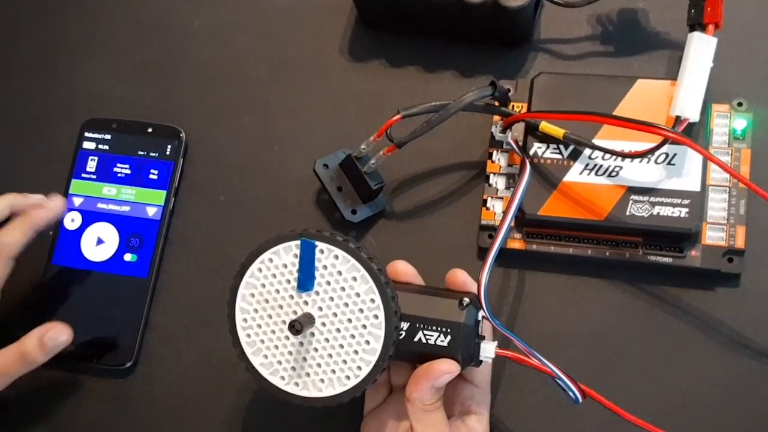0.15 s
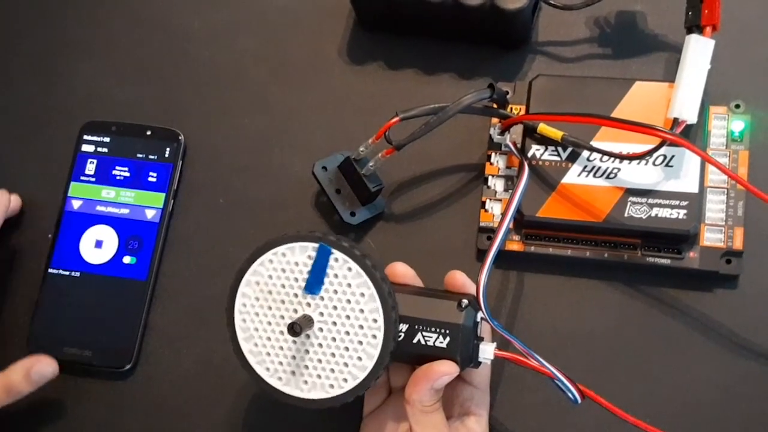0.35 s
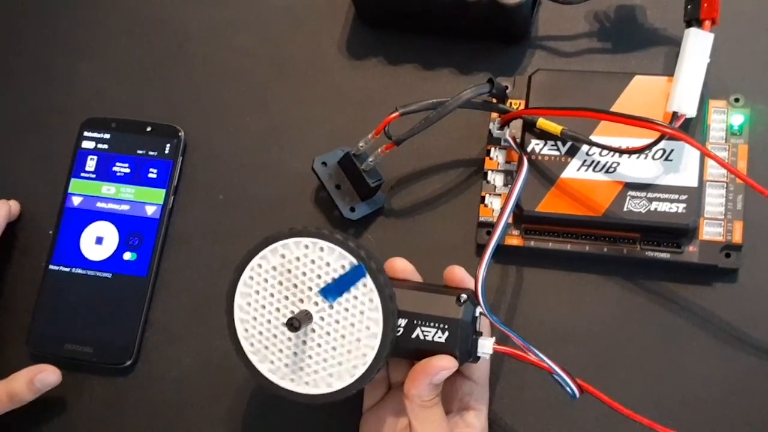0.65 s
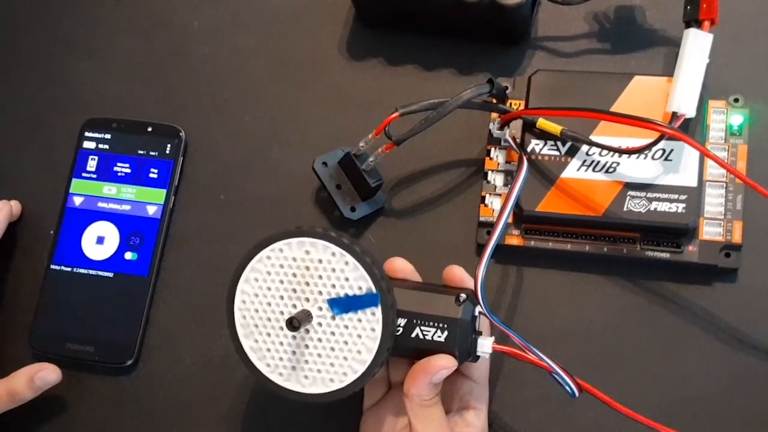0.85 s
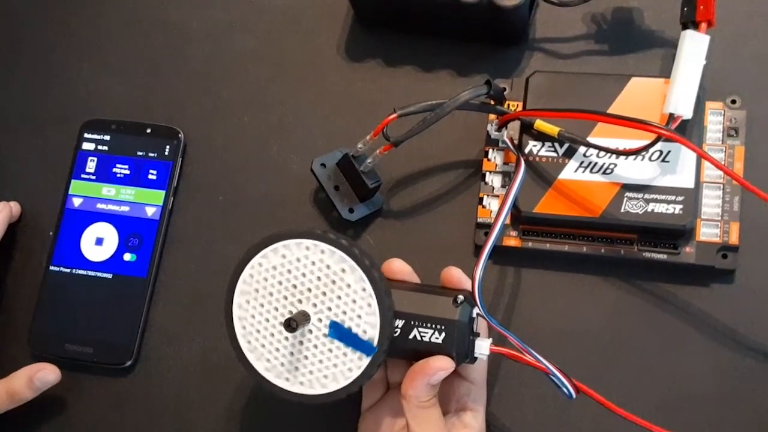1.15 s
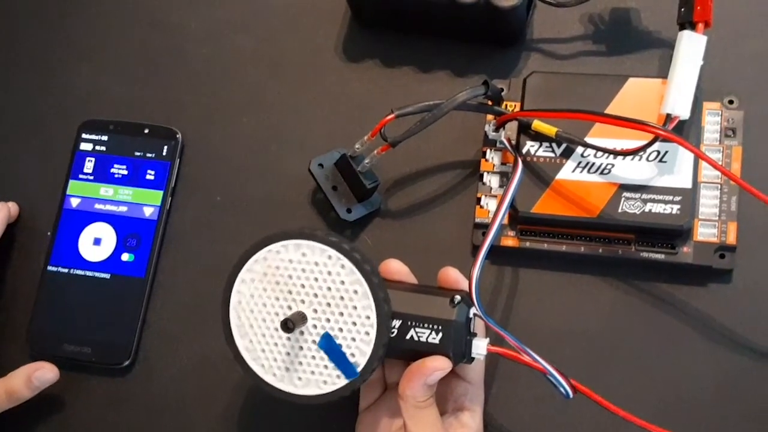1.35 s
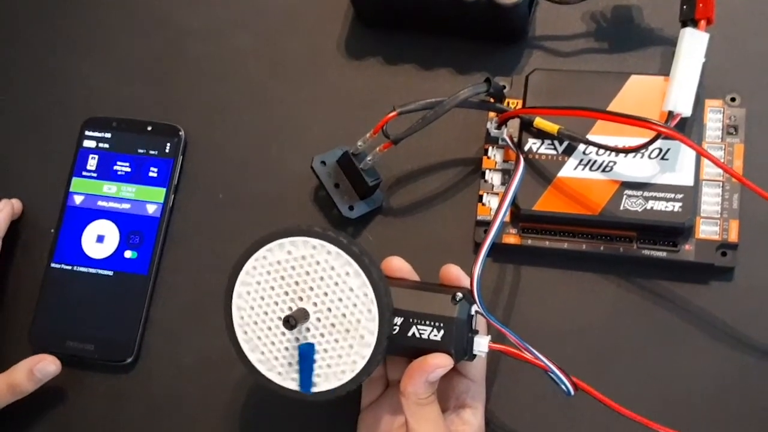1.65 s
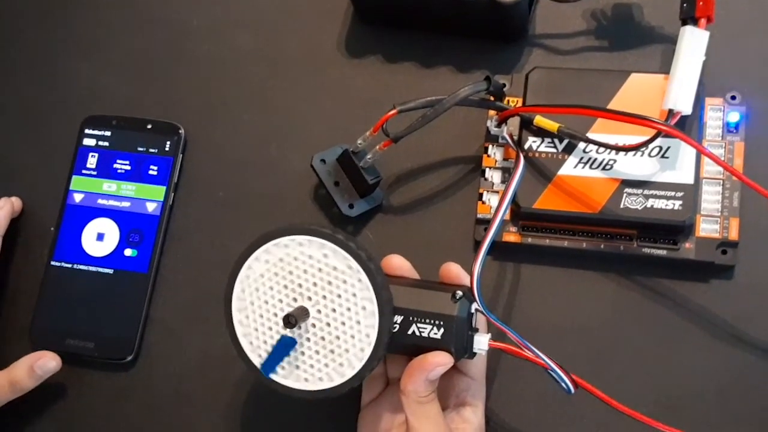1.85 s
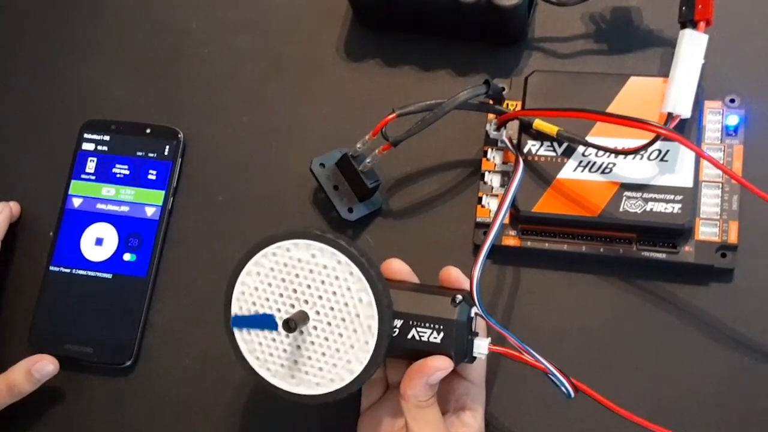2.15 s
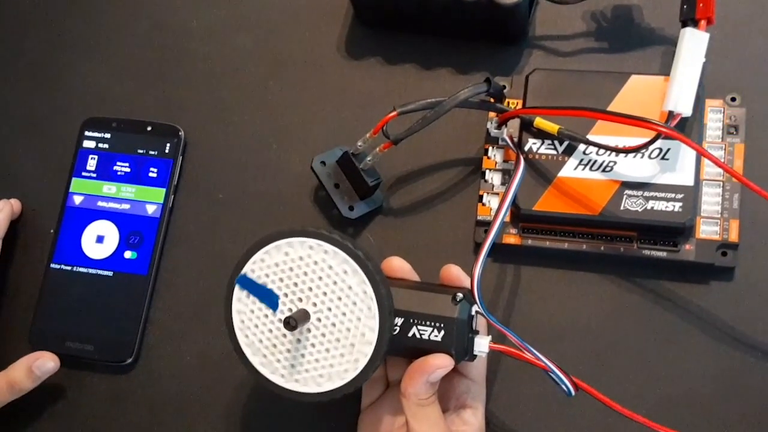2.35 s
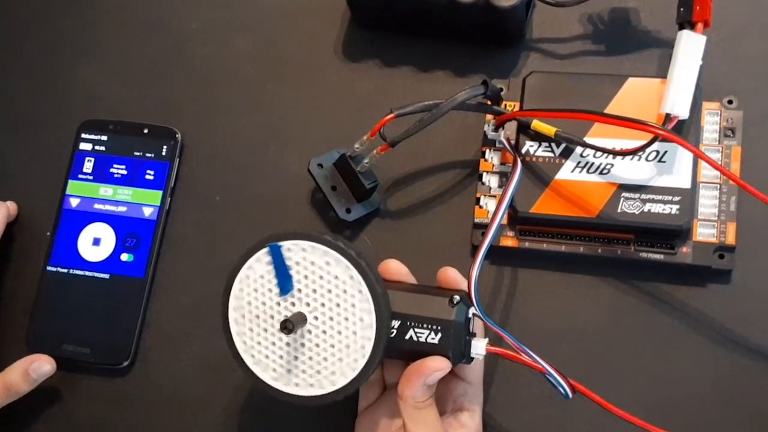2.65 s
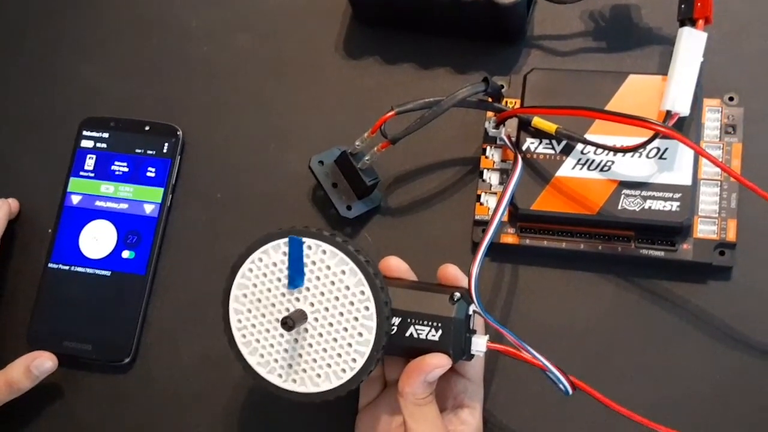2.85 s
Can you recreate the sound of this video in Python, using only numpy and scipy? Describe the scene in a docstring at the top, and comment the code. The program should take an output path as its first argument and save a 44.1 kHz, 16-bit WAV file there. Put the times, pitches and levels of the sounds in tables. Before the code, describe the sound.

Close up indoors, a hand-held gear motor buzzes into life, its rapid plastic gear chatter climbing in pitch over a faint thin electronic tone, holds steady, then halts abruptly, leaving soft room hum.

```python
"""In a quiet room with a low hum, a small geared electric motor is held in a hand over a table.
It starts, climbs to speed in steps and stops. Each gear tooth ticks into the plastic housing: it taps,
scratches and taps again, over steady rubbing. A 10-tooth pinion and a 30-tooth gear pattern the ticks.
Bright clicks mark the play in the gears being taken up, and the hand and table carry a low rumble.
The drive electronics sing one thin high tone, and the walls answer the motor."""
import sys
import numpy as np
from scipy import signal
from scipy.fft import rfft, irfft, next_fast_len
from scipy.io import wavfile

SR = 44100
rng = np.random.default_rng(int(sys.argv[2]) if len(sys.argv) > 2 else 0)


def to_wav(s):
    """Save 16-bit WAV."""
    ch = np.atleast_2d(s).T  # columns
    pcm = np.round(np.clip(ch, -1, 1) * 32767)  # PCM
    wavfile.write(sys.argv[1], SR, pcm.astype(np.int16))


N = 132300

# Colour of the room noise. Each row: frequency in Hz, relative strength in dB per Hz.
AIR_COLOUR = [(18, -7), (30, -43), (98, -18.5), (232, -4.5), (434, -7), (470, -14.5), (678, -7), (733, -18),
              (881, -21), (2200, -18), (2450, -19.5), (9560, -36), (15700, -20)]
# How alike the room noise is on left and right. Each row: frequency in Hz, likeness (1 = the same).
AIR_LIKENESS = [(60, .55), (300, 0.8), (640, 0.43), (3000, 0.34), (12000, .1)]
# Parts of the low hum. Each row: frequency in Hz, level in dB.
HUM_PARTS = [(59.2, -83), (150.7, -77.5), (247.6, -77), (360.7, -75)]
# The tone of the drive electronics. Each row: time in seconds, level in dB.
WHINE_LEVEL = [(.125, -110), (.13, -72), (.31, -70), (1.17, -62.5), (1.92, -60.5), (2.655, -60.5),
               (2.665, -110)]
# How fast the room's answer dies. Each row: frequency in Hz, seconds to fall by 60 dB.
WALL_DECAY = [(1000, .22), (2500, 0.5), (4000, 0.28), (7000, 0.38), (12000, 0.34)]
# Colour of the shaking through hand and table. Each row: frequency in Hz, relative strength in dB per Hz.
RUMBLE_COLOUR = [(40, -13), (100, -8), (200, -1.5), (400, -2.5), (700, -12), (1100, -11), (1500, -64)]
# Gear play being taken up. Each row: time in seconds, starting level in dB before colouring.
SLACK_CLICKS = [(0.1386, -42.5), (2.6467, -33), (2.6529, -23)]
# Colour of those clicks. Each row: frequency in Hz, gain in dB.
SLACK_TONE = [(700, -45), (1400, -14), (3000, -3), (5000, 2), (13000, 2), (16000, -8)]
# How fast the gears run. Each row: time in seconds, teeth meshing per second.
TOOTH_RATE = [(.131, 10), (.15, 85.7), (.19, 134.2), (.23, 156.9), (.3, 163.2), (.38, 188.7), (.46, 194.2),
              (.57, 196.4), (.61, 224.3), (.68, 230.5), (.78, 245.7), (1.03, 247.2), (1.08, 269),
              (1.16, 273.3), (1.35, 272.8), (1.41, 288.2), (1.48, 283.8), (1.56, 300.1), (1.76, 301.3),
              (1.82, 320), (1.91, 329.8), (1.97, 309.3), (2.06, 329.1), (2.64, 330.2), (2.68, 261),
              (2.72, 202.2), (2.749, 84.5), (2.765, 65), (2.77, 0)]
# How hard the gears work. Each row: time in seconds, level in dB, treble over it in dB before the lift.
GEAR_LOAD = [(.13, -52.5, -17), (.19, -42.5, -14.5), (.3, -37.5, -14), (.36, -34.5, -10),
             (.39, -36.5, -14.5), (.44, -34.5, -13.5), (.51, -35, -9.5), (.55, -36, -11), (.62, -34.5, -13),
             (.9, -34, -12.5), (.93, -34.5, -15.5), (.97, -34.5, -12.5), (1.82, -35, -12),
             (1.865, -35, -10), (1.91, -34.5, -16.5), (1.955, -34.5, -10), (2.0, -35, -11.5),
             (2.46, -35, -12.5), (2.5, -33.5, -11.5), (2.55, -35, -14), (2.64, -35.5, -11),
             (2.68, -34.5, -10), (2.75, -37.5, -14.5), (2.77, -58, -12)]
# Strength of each tooth of the gear, in dB.
TOOTH_STRENGTH_DB = [2, 2, 1, 1, -2, 1, -3, 0, -8, 0, -3, 1, 1, 1, 0, -5, 0, -2, 1, 0, 0, 1, 1, 2, 0, 1, -2,
                     1, 2, -5]
# Low, middle and high layer of a tick. Each row: scratch time in seconds, random scatter in dB,
# swing with the pinion in dB, swing with the gear in dB, scratch over the tap in dB,
# rubbing at full speed in dB, left-right likeness of the grit from 0 to 1.
TICK_LAYERS = [(.0006, 1.1, 1, 0.091, -3.5, 1, 0.5), (.0007, 0.7, -0.7, 0.033, -8, -9, 0.76),
               (.0009, 1.1, 1.06, 0.51, 8.5, 8.5, .45)]
# Where the three layers begin and end, in Hz.
LAYER_EDGES_HZ = [200, 2150, 6300, 17000]
# Resonances of the plastic housing. Each row: frequency in Hz, relative gain in dB.
HOUSING_GAIN = [(410, -56.5), (700, -35), (1160, -29), (1360, -15.5), (1510, -7.5), (1660, -12.5),
                (1980, -20.5), (2250, -21.5), (2520, -12.5), (2750, -16), (2970, -13.5), (3300, -14.5),
                (3650, -14.5), (3850, -6.5), (3980, -0.6), (4320, 0.1), (4580, -3), (4820, -10),
                (5100, -7.5), (5450, -10), (6160, -12.5), (6700, -10), (7390, -19.5), (7990, -18.5),
                (8660, -13), (9100, -24.5), (9450, -16.5), (10300, -21.5), (11000, -16.5), (12200, -17.5),
                (12750, -15.5), (13500, -21.5), (14500, -24), (15700, -30.5)]
# How far left runs ahead of right in the motor's direct sound. Each row: frequency in Hz, phase in radians.
LEFT_LEAD = [(300, 1.2), (1460, 0.45), (2840, 1.24), (3270, 1.83), (3700, 0.44), (4740, 1.14), (7410, 3),
             (15400, 9)]
# How much louder left is than right. Each row: frequency in Hz, difference in dB.
LEFT_LEAN = [(60, -2), (99, 5), (160, 4.5), (270, -1), (450, 1), (740, 1.5), (1220, 9), (2010, 0.5),
             (3330, 4), (5500, -2.5), (9080, -3.5), (15000, -4.5)]

AIR_DB, HUM_WIDTH_HZ = -64.5, 5.3
WHINE_HZ = 10081
WALLS_DB = -9
RUMBLE_DB = -31  # over the gear load
SLACK_T60_S = .009
PINION_TEETH, GEAR_TEETH = 10, 30
PINION_PEAK, GEAR_PEAK = 2.6, 1.2  # tooth at the top of each swing
FULL_SPEED = 330  # teeth per second; slower running is more even and rubs less
JITTER_S, EARLY_S = .0002, .0012  # random timing of a tick; every tick is placed this much early
WEAKER_DB = 0.5  # average random loss of a tooth at full speed
REBOUND_S, REBOUND_DB, REBOUND_SCATTER_DB = .0013, -10, 4  # a tooth taps again
TREBLE_LIFT_DB = 11  # for the high layer
BLEND_HZ = 250  # softness of the layer edges
SPREAD_S = .0012  # bending waves at 4 kHz arrive this late, low after high
BUILD_UP = 0.21  # share of the ring before the peak
TOP_HZ = 15790


def amp(db):
    """Turn dB into a plain multiplier."""
    return 10 ** (np.asarray(db) / 20)


def unit(x):
    """Scale a sound to an average (RMS) strength of 1."""
    return x / np.sqrt(np.mean(x ** 2) + 1e-20)


def along(points, hz):
    """Read a value between (Hz, value) points on a log frequency axis."""
    f, v = np.transpose(points)
    return np.interp(np.log(hz + 1), np.log(f + 1), v)


def curves(rows, before=None):
    """Give one value per sample for each column after the time."""
    s, *columns = np.transpose(rows)
    return [np.interp(np.arange(N) / SR, s, c, left=before) for c in columns]


def filtered(x, response):
    """Multiply the spectrum of a sound by a response to frequency, which may be complex."""
    m = 2 * next_fast_len(N // 2 + SR // 4)
    return irfft(rfft(x, m) * response(np.fft.rfftfreq(m, 1 / SR)), m)[..., :N]


def causal(gain):
    """Give this gain the phase that makes it ring only after a blow (minimum phase)."""
    c = irfft(np.log(gain + 1e-6))
    c[1:len(c) // 2] *= 2
    c[len(c) // 2 + 1:] = 0
    return np.exp(rfft(c))


def above(hz, edge_hz):
    """A soft step from 0 to 1 around an edge in frequency."""
    return .5 + .5 * np.tanh((hz - edge_hz) / BLEND_HZ)


def air():
    """Room noise, partly alike on both sides, and a low hum of narrow noise bands that waver."""
    def mid_and_side(hz):
        turn = np.arccos(along(AIR_LIKENESS, hz)) / 2
        return amp(along(AIR_COLOUR, hz)) * np.array([np.cos(turn), np.sin(turn)])

    mid, side = filtered(rng.standard_normal((2, N)), mid_and_side)
    hum = np.zeros(N)
    for hum_hz, db in HUM_PARTS:
        band = filtered(rng.standard_normal(N), lambda hz: 1 / (1 + ((hz - hum_hz) / HUM_WIDTH_HZ) ** 2))
        hum += amp(db) * unit(band)
    return amp(AIR_DB) * unit(np.array([mid + side, mid - side])) + hum


def walls(x, count=24):
    """The room's answer is diffuse, its fine grain changing all the time; each frequency dies at its own speed."""
    noise = rng.standard_normal((count + 1, 2, SR // 2))
    hz, t, spectrum = signal.stft(noise, SR, nperseg=256)
    fade = amp(-60 * t / along(WALL_DECAY, hz)[:, None])
    tails = signal.istft(spectrum * fade, SR, nperseg=256)[1]
    hop = N // count + 1
    out = np.zeros((2, 2 * N))
    x = np.pad(x, (hop, 2 * hop))
    # overlapping pieces of the sound, each with its own tail
    for k, tail in enumerate(tails):
        part = x[k * hop:(k + 2) * hop] * np.sqrt(np.hanning(2 * hop))
        wet = signal.fftconvolve(part[None], tail / np.linalg.norm(tail[0]), axes=1)
        out[:, k * hop:k * hop + wet.shape[1]] += wet
    late = hop - 150  # the answer comes 150 samples late
    return out[:, late:late + N]


def whine():
    """The switching tone of the motor drive: one steady sine, the same on both sides."""
    level_db, = curves(WHINE_LEVEL)
    sine = np.sin(2 * np.pi * WHINE_HZ * np.arange(N) / SR)
    return np.sqrt(2) * amp(level_db) * sine


def rumble():
    """The motor shakes the hand and the table: low noise that follows the load while the gears turn."""
    noise = filtered(rng.standard_normal(N), lambda hz: amp(along(RUMBLE_COLOUR, hz)))
    level_db = curves(GEAR_LOAD, before=-120)[0] + RUMBLE_DB
    turning = curves(TOOTH_RATE, before=0)[0] > 0
    return amp(level_db) * turning * unit(noise)


def slack():
    """A bright click, a fast-dying burst of noise, when the torque comes on or goes off."""
    out, t = np.zeros(N), np.arange(SR // 100) / SR
    for s, db in SLACK_CLICKS:
        burst = amp(db - 60 * t / SLACK_T60_S) * rng.standard_normal(len(t))
        out[round(s * SR):][:len(t)] += burst
    return filtered(out, lambda hz: causal(amp(along(SLACK_TONE, hz))))


def housing(hz):
    """The shell's colour; a contact builds up a little and spreads out on its way through the plastic."""
    gain = amp(along(HOUSING_GAIN, hz))
    ring = np.unwrap(np.angle(causal(gain))) * (1 - BUILD_UP)
    travel = 4 * np.pi * SPREAD_S * np.sqrt(4000 * hz)
    return gain * np.exp(1j * (ring - travel)) / np.sqrt(np.mean(gain ** 2))


def gears():
    """Every tooth taps, scratches and taps again, over steady rubbing, rung through the housing."""
    speed, = curves(TOOTH_RATE, before=0)
    level_db, treble_db = curves(GEAR_LOAD, before=-120)
    turned = np.cumsum(speed) / SR  # teeth passed so far
    tooth = np.arange(int(turned[-1]) + 1)
    chance = rng.standard_normal((len(tooth), 7))

    # sample numbers of each tap and its rebound
    shift = np.round((JITTER_S * chance[:, 0] - EARLY_S) * SR).astype(int)
    start = np.searchsorted(turned, tooth + 1e-6) + shift
    again = start + np.round(REBOUND_S * np.exp(.4 * chance[:, 5]) * SR).astype(int)

    # strength of each tooth, shared by all layers
    weaker_db = WEAKER_DB * speed[start] / FULL_SPEED * chance[:, 1] ** 2
    shared_db = np.array(TOOTH_STRENGTH_DB)[tooth % GEAR_TEETH] - weaker_db
    rebound_db = REBOUND_DB + REBOUND_SCATTER_DB * chance[:, 6]
    pinion = np.cos(2 * np.pi * (tooth - PINION_PEAK) / PINION_TEETH)
    gear = np.cos(2 * np.pi * (tooth - GEAR_PEAK) / GEAR_TEETH)

    t = np.arange(SR // 100) / SR
    grit = rng.standard_normal((2, 2, N))
    out = 0
    for k, (scratch_s, scatter_db, pinion_db, gear_db, scratch_db, rub_db, alike) in enumerate(TICK_LAYERS):
        # left and right share some of the grit
        turn = np.arccos(alike) / 2
        rough = np.cos(turn) * grit[:, :1] + np.sin(turn) * grit[:, 1:] * [[1], [-1]]
        scratch_grit, rub_grit = rough

        swing_db = pinion_db * pinion + gear_db * gear
        size = amp(shared_db + swing_db + scatter_db * chance[:, 2 + k])
        taps = np.bincount(start, size, N)
        rebounds = np.bincount(again, size * amp(rebound_db), N)
        scratch_shape = t / scratch_s * np.exp(-2 * t / scratch_s)
        scratch = unit(signal.fftconvolve(taps, scratch_shape)[:N] * scratch_grit)
        rub = amp(rub_db + np.interp(turned, tooth, swing_db)) * rub_grit * speed / FULL_SPEED

        drive = unit(unit(taps + rebounds) + amp(scratch_db) * scratch + rub)
        is_high = k == 2
        drive = drive * amp(level_db + (treble_db + TREBLE_LIFT_DB) * is_high)
        low_hz, high_hz = LAYER_EDGES_HZ[k], LAYER_EDGES_HZ[k + 1]
        out = out + filtered(drive, lambda hz: above(hz, low_hz) - above(hz, high_hz))
    return filtered(out, housing)


def scene():
    """The motor reaches left and right by different paths, with the room and the drive tone added."""
    motor = gears() + slack() + rumble()
    sign = np.array([[.5], [-.5]])  # half of each difference to the left, half to the right
    near = filtered(motor, lambda hz: np.exp(1j * sign * along(LEFT_LEAD, hz)))
    heard = near + amp(WALLS_DB) * walls(motor.mean(axis=0)) + air()
    return filtered(heard, lambda hz: amp(sign * along(LEFT_LEAN, hz))) + whine()


def record(dry):
    """Nothing is kept above the band limit."""
    return filtered(dry, lambda hz: hz < TOP_HZ)


dry = scene()
out = record(dry)
to_wav(out)
```